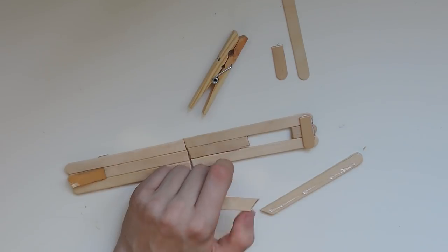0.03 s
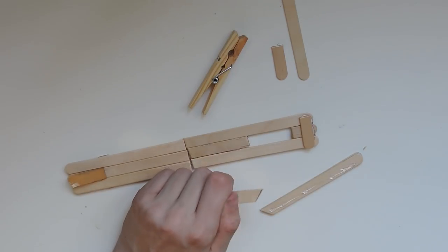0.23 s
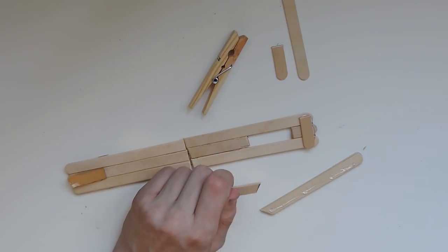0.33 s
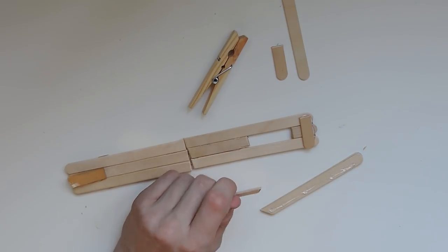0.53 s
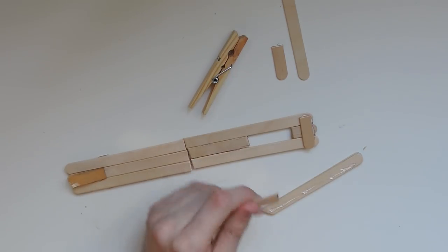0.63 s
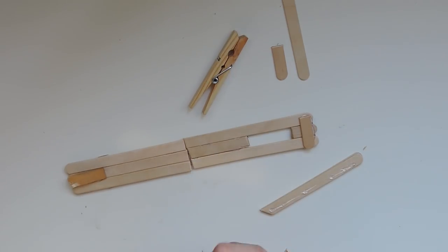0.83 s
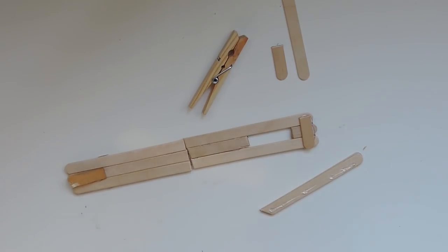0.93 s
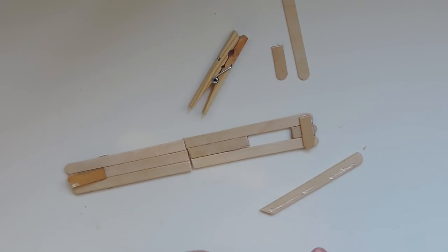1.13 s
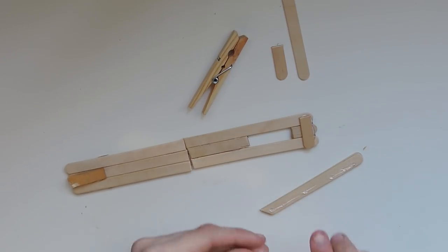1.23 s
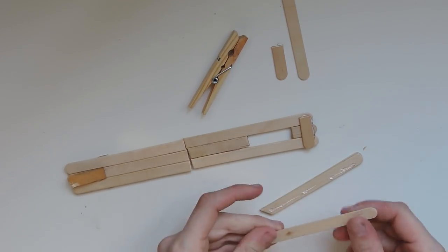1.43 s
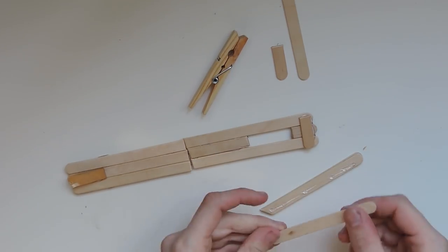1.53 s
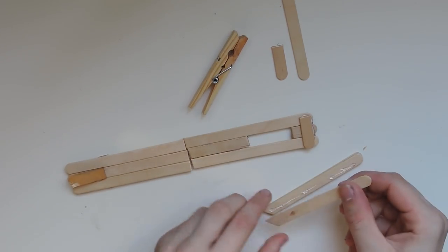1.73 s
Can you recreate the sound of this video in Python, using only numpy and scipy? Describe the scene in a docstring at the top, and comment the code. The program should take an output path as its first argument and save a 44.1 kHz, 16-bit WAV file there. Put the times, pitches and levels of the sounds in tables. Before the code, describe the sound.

Wooden craft sticks tap, clack and knock on a table in one quick cluster. Soft thumps follow as the hand lifts away, then light stick clicks and faint finger brushes, heard close up in a small quiet room.

```python
"""Wooden craft sticks handled on a table in a small quiet room, over a faint fan and hiss. A stick tip taps, a
stick snaps down flat, then hand and sticks knock on the table top, with echoes; each blow rings the wood's
modes. The table booms softly as the hand drags and lifts away. Light stick touches and finger brushes follow,
with one slow waft of air from the hands."""
import sys
import numpy as np
from scipy import signal
from scipy.fft import rfft, irfft
from scipy.io import wavfile

SR = 44100
rng = np.random.default_rng(int(sys.argv[2]) if len(sys.argv) > 2 else 0)


def persist_wave(psi):
    """Save psi, clipped to +-1, as 16-bit WAV."""
    counts = np.round(np.clip(psi, -1, 1) * 32767).astype(np.int16)
    wavfile.write(sys.argv[1], SR, np.atleast_2d(counts).T)


N = 79380

# table top under a soft hand: (frequency [Hz], level [dB], t60 [s])
SOFT_TABLE_MODES = [(212, 1, .19), (328, -4, .1), (372, -3, .22), (438, -4, .15)]
TABLE_GRAIN = dict(t60_s=0.07, bass_hz=984, treble_hz=4496, fizz_db=-20.5)


def amp(db):
    """Decibels to gain."""
    return 10 ** (np.asarray(db) / 20)


def unit_rms(x):
    """Scale to rms 1."""
    return x / np.sqrt(np.mean(x ** 2) + 1e-20)


def unit_energy(x):
    """Scale to mean energy 1 per channel."""
    return unit_rms(x) / np.sqrt(x.shape[-1])


def lookup(points, hz):
    """Interpolate on a log-frequency axis."""
    knots_hz, values = np.transpose(points)
    return np.interp(np.log(hz + 1), np.log(knots_hz + 1), values)


def add(mix, start_s, sound):
    """Mix in place from start_s."""
    part = mix[..., round(start_s * SR):][..., :sound.shape[-1]]
    part += sound[..., :part.shape[-1]]


def cut(x, hz, kind, order):
    """Causal low-pass or high-pass."""
    return signal.sosfilt(signal.butter(order, hz, kind, fs=SR, output="sos"), x)


def swell(centre_s, width_s):
    """Gaussian envelope, peak 1."""
    return np.exp(-2 * ((np.arange(N) / SR - centre_s) / width_s) ** 2)


def diffuse(size, colour=np.ones_like, shared=1, spacing_m=0.061):
    """Noise from all sides at two close microphones: alike in the bass, unrelated in the treble."""
    hz = np.fft.rfftfreq(size, 1 / SR)
    mid, side = rfft(rng.standard_normal((2, size)))
    coherence = shared * np.sinc(2 * hz * spacing_m / 343)
    mid, side = mid * np.sqrt(1 + coherence), side * np.sqrt(1 - coherence)
    return unit_rms(irfft(np.array([mid + side, mid - side]) * colour(hz), size))


def background(air_db=-64):
    """Room air, microphone hiss and steady fan tones."""
    # noise floor: (frequency [Hz], relative density [dB])
    air_spectrum = [(20, -9.5), (30, -5), (39, 5.5), (48, 1.5), (75, -4), (140, -4.5), (260, -9),
                    (500, -12), (900, -14), (2000, -15.5), (4200, -19.5), (6500, -26.5), (11000, -29),
                    (15500, -32.5)]
    # fan: (frequency [Hz], rms level [dB])
    fan_tones = [(145.3, -80), (843, -85), (899, -83), (1599, -91)]
    t = np.arange(N) / SR
    fan = sum(amp(db) * np.sqrt(2) * np.sin(2 * np.pi * (hz * t + rng.random())) for hz, db in fan_tones)
    return fan + amp(air_db) * diffuse(N, lambda hz: amp(lookup(air_spectrum, hz)), shared=0.57)


def room(x, level_db=-12, gap_s=0.005):
    """Small-room tail, each band dying at its own rate."""
    # room decay: (frequency [Hz], t60 [s])
    decay_times = [(100, 0.86), (400, 0.19), (1200, 0.068), (3000, 0.24), (8000, 0.099), (16000, 0.095)]
    noise = cut(diffuse(SR // 2), 350, "high", order=1)
    hz, t, bands = signal.stft(noise, SR, nperseg=256)
    decay = amp(-60 * t / lookup(decay_times, hz)[:, None])
    tail = signal.istft(bands * decay, SR, nperseg=256)[1]
    wet = np.zeros((2, N))
    add(wet, gap_s, signal.fftconvolve(x.mean(0)[None], unit_energy(tail), axes=1))
    return amp(level_db) * wet


def waft(centre_s=1.383, width_s=0.04, hz=10.5, gain_db=-46):
    """One slow pressure wave pushed by the hands."""
    t = np.arange(N) / SR - centre_s
    return amp(gain_db) * np.sin(2 * np.pi * hz * t) * np.exp(-(t / width_s) ** 2)


def rubs():
    """Skin brushes the wood: swells of band noise."""
    # strokes: (centre [s], width [s], level [dB], pitch [Hz], spread [octaves])
    strokes = [(0.42, 0.11, -65, 3170, 0.44), (0.993, 0.054, -76, 13500, 0.55),
               (1.367, 0.044, -69.5, 2670, 0.56), (1.51, 0.15, -68.5, 199, 0.32),
               (1.716, 0.084, -74, 212, 0.47)]
    out = np.zeros((2, N))
    for centre_s, width_s, db, pitch_hz, octaves in strokes:
        hiss = diffuse(N, lambda hz: np.exp(-.5 * (np.log2((hz + 1) / pitch_hz) / octaves) ** 2))
        out += amp(db) * hiss * swell(centre_s, width_s)
    return out


def body(modes, push_db, modes_db, dense_db, dense_t60_s, dense_hz, spread_rad=0.13):
    """Wood's impulse response: first push, modes of alternating sign, dense ring above dense_hz."""
    t = np.arange(SR // 2) / SR
    stereo_rad = spread_rad * rng.choice([-1, 1], len(modes))[:, None, None] * np.array([[1], [-1]])
    ring = sum((-1) ** k * amp(db - 60 * t / t60_s) * np.sin(2 * np.pi * hz * t + stereo_rad[k])
               for k, (hz, db, t60_s) in enumerate(modes))
    dense = cut(diffuse(len(t)), dense_hz, "high", order=2) * amp(-60 * t / dense_t60_s)
    push = amp(push_db) * (t == 0)
    return push + amp(modes_db) * ring * 200 / SR + amp(dense_db) * unit_energy(dense)


def crunch(t60_s, bass_hz, treble_hz, fizz_db):
    """Rough fibres catch and slip as two surfaces meet."""
    t = np.arange(SR // 10) / SR
    grit = cut(diffuse(len(t)) * amp(-60 * t / t60_s), bass_hz, "high", order=1)
    fizz = amp(fizz_db) * cut(grit, 2 * treble_hz, "low", order=1)
    return unit_energy(cut(grit, treble_hz, "low", order=5) + fizz)


def blows(contacts, response, grain):
    """Force pulses ring a body, duller when soft, thinner when light; crunch on top."""
    force, grit = np.zeros(N), np.zeros((2, N))
    click = signal.unit_impulse(SR // 10)
    for start_s, db, bass_hz, treble_hz, crunch_db in contacts:
        pulse = cut(cut(click, bass_hz, "high", order=2), treble_hz, "low", order=5)
        add(force, start_s, amp(db) * pulse)
        add(grit, start_s, amp(db + crunch_db) * crunch(**grain))
    return signal.fftconvolve(force[None], response, axes=1)[:, :N] + grit


def soft_table():
    """Table's response to a soft hand; the negative t60 makes its faint dense ring grow for 0.5 s."""
    return body(SOFT_TABLE_MODES, push_db=-2, modes_db=6.5,
                dense_db=-12.5, dense_t60_s=-1.2, dense_hz=391)


def hand_drag(centre_s=0.737, width_s=0.083, level_db=-60.5):
    """Skin friction keeps the table's low modes humming."""
    friction = cut(rng.standard_normal(N), 397, "low", order=6) * swell(centre_s, width_s)
    hum = signal.fftconvolve(friction[None], soft_table(), axes=1)[:, :N]
    return amp(level_db) * unit_energy(hum) * np.sqrt(width_s * SR)


def hand_bumps():
    """The lifting hand bumps the table: soft booms."""
    # bumps: (time [s], level [dB], bass edge [Hz], treble edge [Hz], relative crunch [dB])
    contacts = [(0.5810, -9, 159, 423, -35), (0.6708, -17, 166, 430, -34), (0.7355, -19.5, 160, 370, -42),
                (0.7866, -13, 416, 880, -30)]
    return blows(contacts, soft_table(), TABLE_GRAIN)


def tip_tap():
    """A held stick taps once with its tip."""
    # tap: (time [s], level [dB], bass edge [Hz], treble edge [Hz], relative crunch [dB])
    contacts = [(0.2103, -11.5, 552, 1204, -30.5)]
    # stick on its tip: (frequency [Hz], level [dB], t60 [s])
    tip_modes = [(446, 2, .07), (552, 11, .1), (680, 3, .06), (800, 5, .06), (875, 6, .07), (1047, 0, .08),
                 (1405, -2, .08), (1620, 8, .06)]
    response = body(tip_modes, push_db=3, modes_db=5.5, dense_db=-3.5, dense_t60_s=3.5, dense_hz=498)
    return blows(contacts, response, TABLE_GRAIN)


def stick_clacks():
    """A stick snaps down flat and rings brightly; light touches follow."""
    # clacks: (time [s], level [dB], bass edge [Hz], treble edge [Hz], relative crunch [dB])
    contacts = [(0.3320, -6, 129, 1820, -26), (0.3339, -9.5, 1060, 3430, -12),
                (0.3366, -15, 1060, 3670, -8.5), (0.3445, -18, 786, 2970, -14),
                (0.7875, -27.5, 217, 3330, -23), (1.1562, -25, 790, 1910, -12),
                (1.1788, -30.5, 650, 1480, -16)]
    # flat stick: (frequency [Hz], level [dB], t60 [s])
    stick_modes = [(170, 5, .05), (240, 6, .07), (316, 7, .19), (349, 6, .11), (454, 8, .11), (730, 1, .08),
                   (899, 1, .12), (1415, 7, .1), (1780, 3, .1), (1840, 2, .15), (2590, -3, .12),
                   (2720, -2, .16), (3461, -1, .13), (4942, -2, .14)]
    response = body(stick_modes, push_db=-5.5, modes_db=1.5,
                    dense_db=-0.5, dense_t60_s=0.15, dense_hz=440)
    grain = dict(t60_s=0.25, bass_hz=1295, treble_hz=5596, fizz_db=-14.5)
    return blows(contacts, response, grain)


def table_knocks_and_echoes():
    """Hand and sticks strike the table top and ring its modes; the knock at 0.4803 s comes back as echoes at
    0.4855 s and 0.5104 s."""
    # knocks and their echoes: (time [s], level [dB], bass edge [Hz], treble edge [Hz], relative crunch [dB])
    contacts = [(0.4443, 14, 130, 270, -38), (0.4455, -6.5, 350, 1380, -17.5), (0.4608, 3.5, 316, 650, -30),
                (0.4803, 0.5, 306, 1580, -28), (0.4855, -6.5, 148, 1530, -49),
                (0.5104, -11.5, 636, 1350, -27)]
    # table top: (frequency [Hz], level [dB], t60 [s])
    table_modes = [(111, -6, .15), (148, 4, .05), (185, 6, .055), (232, 2, .13), (320, -8, .13),
                   (378, -3, .18), (428, 2, .13), (592, 2, .12), (645, -1, .16), (712, 1, .15),
                   (783, 1, .15), (905, 4, .13), (1149, -2, .14), (1276, 0, .14), (1420, -3, .1),
                   (1570, 0, .11), (2060, 3, .06)]
    response = body(table_modes, push_db=0, modes_db=0.5, dense_db=-0.5, dense_t60_s=0.16, dense_hz=474)
    return blows(contacts, response, TABLE_GRAIN)


def scene(balance_db=-0.6):
    """Wood contacts with room tail, slightly right, over rubs, waft and background."""
    wood = tip_tap() + stick_clacks() + table_knocks_and_echoes() + hand_bumps() + hand_drag()
    balance = amp([[balance_db / 2], [-balance_db / 2]])
    return (wood + room(wood)) * balance + rubs() + waft() + background()


def record(dry):
    """Linear-phase band limit."""
    edge_hz = 15780
    lowpass = signal.firwin(601, edge_hz, window=("kaiser", 8), fs=SR)
    return signal.oaconvolve(dry, lowpass[None], "same")


dry = scene()
out = record(dry)
persist_wave(out)
```